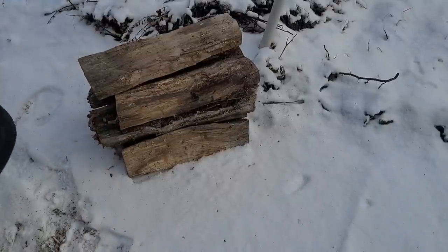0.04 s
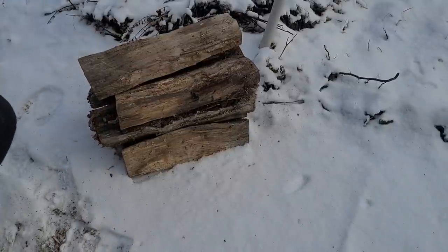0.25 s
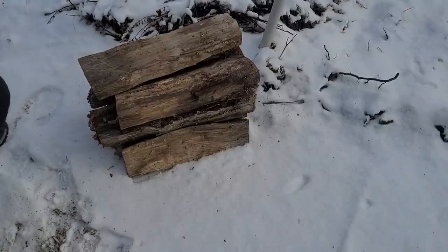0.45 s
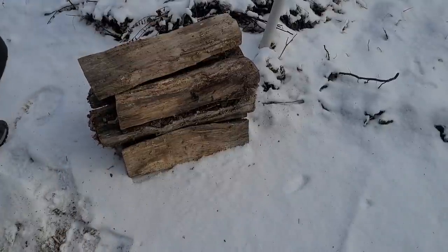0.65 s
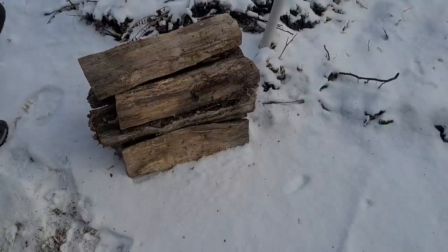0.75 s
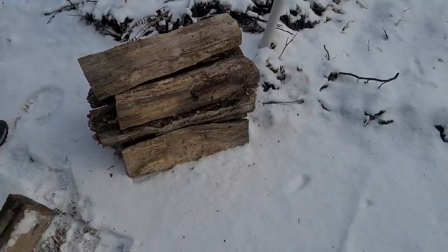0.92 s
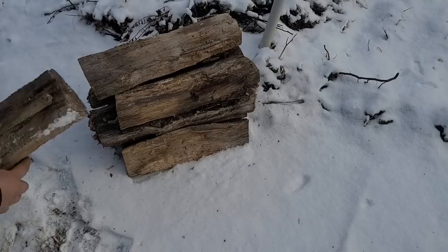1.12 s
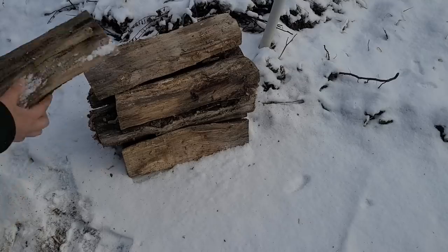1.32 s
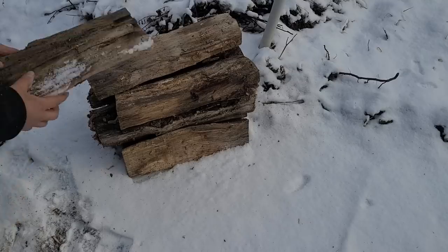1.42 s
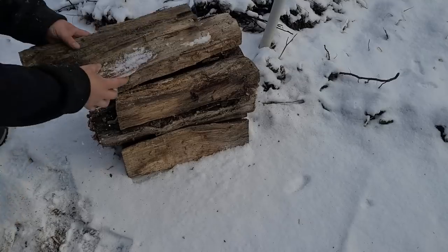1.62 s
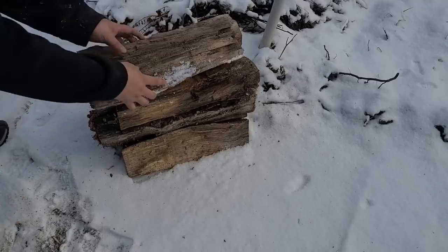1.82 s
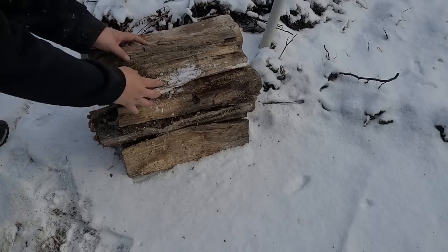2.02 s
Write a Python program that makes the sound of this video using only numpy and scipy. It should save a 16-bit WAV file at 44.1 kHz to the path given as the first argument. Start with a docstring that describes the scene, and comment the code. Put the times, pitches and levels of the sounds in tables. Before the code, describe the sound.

One sharp wooden clack as a log lands on a stack, over low wind rumble.

```python
"""A split log is laid on a small woodpile in the snow, near the microphone: two dull knocks, a sharp
clack as it drops home, then it rocks and settles. Each contact rings the wood and cracks the bark.
Before that come small ticks in the snow crust, then one soft low scuff, perhaps a sleeve. These near
sounds bounce once off the snow and scatter faintly round the yard. Puffs of wind buffet the microphone
over a steady far hush and a faint drone."""
import sys
import numpy as np
from scipy import signal
from scipy.fft import rfft, irfft, next_fast_len
from scipy.io import wavfile

SR = 44100
rng = np.random.default_rng(int(sys.argv[2]) if len(sys.argv) > 2 else 0)


def materialize(psi):
    """Save the field psi as 16-bit PCM at rate SR to the path in sys.argv[1].

    A 1-D psi becomes a single channel; in a 2-D psi each row is a channel.
    """
    bounded = np.clip(np.atleast_2d(psi).T, -1, 1)
    quanta = np.round(bounded * 32767).astype(np.int16)
    wavfile.write(sys.argv[1], SR, quanta)


N = 90757
T = np.arange(N) / SR


def log_on_stack():
    """Each contact pushes the wood's modes by where it lands and cracks the bark; the bark crumbles."""
    # log meets stack: start_s, push_db, hardness_hz, lowest_hz, place (0-1 along the log),
    # crack_db, crack_hz, crack_width_hz
    knocks = [(1.8436, -16.5, 1420, 453, .301, -24, 1930, 298),
              (1.8604, -10, 766, 60, 0.64, -34, 5100, 2490),
              (1.8622, -20.5, 1840, 100, .229, -33, 5700, 2520),
              (1.8715, -18, 1160, 710, 0.14, -39, 5300, 2200),
              (1.8734, -19.5, 6400, 262, 0.62, -26.5, 4070, 2480),
              (1.8779, -10, 9160, 670, .165, -27, 4900, 4400),
              (1.9182, -28, 2520, 840, 0.7, -50, 3720, 2500),
              (1.9510, -38.5, 3520, 1920, 0, -47, 4200, 2500),
              (2.0510, -40, 1530, 206, 0.17, -50, 3500, 2500)]
    # modes of the logs, by number of nodes along the wood: pitch_hz, level_db, t60_s
    modes = [(252, -8, 0.089), (396, -3, 0.07), (432, 8, 0.022), (442, 11, 0.013), (662, -11.5, 0.054),
             (745, -5, .07), (892, -4.5, 0.12), (1070, -7.5, 0.068), (1510, -2, 0.018), (1745, -3.5, 0.03),
             (2440, -11, .022), (2210, -7.5, 0.013), (2530, -8.5, 0.01), (3170, -1.5, 0.025)]
    # bark crumbling under the log: start_s, length_s, level_db
    scrapes = [(1.838, 0.058, -29.5), (1.885, 0.033, -38.5), (1.945, 0.018, -42)]
    # colour of the crumbling: frequency_hz, gain_db
    bark_colour = [(300, -7.5), (800, 2.5), (1800, -4), (3000, -8.5), (6000, -25), (9000, -35),
                   (16000, -35)]
    forces, places, bark = [], [], 0
    for start, push_db, hardness_hz, lowest_hz, place, crack_db, crack_hz, width_hz in knocks:
        offset = (T - start) * SR
        click = from_db(push_db) * np.sinc(offset) * (np.abs(offset) < 4)
        forces.append(cut(cut(click, hardness_hz, "low"), lowest_hz, "high", order=1))
        places.append(place)
        bark += snap(start, crack_db, crack_hz, width_hz, t60=.02, spray_db=-5.5,
                     top_hz=2.07 * hardness_hz)
    for start, length, db in scrapes:
        swell = np.sin(np.pi * np.clip((T - start) / length, 0, 1))
        bark += from_db(db) * swell * unit_rms(coloured(grit(), bark_colour))
    forces, places = np.array(forces), np.array(places)
    wood = from_db(-21) * ring(forces.sum(axis=0), hz=135, t60=.16)   # the whole stack gives: a thud
    for nodes, (hz, db, t60) in enumerate(modes, 1):
        spread_db = .6 * rng.standard_normal(len(places))
        share = np.cos(np.pi * nodes * places) * from_db(db + spread_db)
        wood += ring(share @ forces, hz, t60)
    wood_right = np.interp(T - .00008, T, wood)   # reaches the right side a little later
    return np.array([wood, wood_right]) + bark


def ticks_and_scuff():
    """Small ticks in the snow crust, then one soft low scuff, perhaps a sleeve: a high and a low band."""
    # four ticks, then the scuff: start_s, high_db, high_hz, high_width_hz, low_db, low_hz
    events = [(0.106, -54, 6000, 3000, -49.5, 1010), (0.3942, -41, 5080, 1250, -43.5, 1210),
              (0.469, -62, 4000, 2000, -49, 920), (0.7447, -37, 3120, 380, -38.5, 994),
              (1.707, -55, 6030, 3000, -34.5, 340)]
    bursts = np.zeros((2, N))
    for start, high_db, high_hz, width_hz, low_db, low_hz in events:
        bursts += snap(start, high_db, high_hz, width_hz, t60=.016, spray_db=-17, top_hz=9000)
        bursts += snap(start, low_db, low_hz, width_hz=213, t60=.045, spray_db=-17, top_hz=low_hz)
    return bursts


def snap(start, db, hz, width_hz, t60, spray_db, top_hz):
    """A brief burst of grains in one band, over a weaker broad spray."""
    grains, envelope = grit(), dying(start, t60)
    band = resonance(resonance(grains, hz, width_hz), hz, width_hz)
    burst = unit_rms(envelope * band) * np.sqrt(np.mean(envelope ** 2))
    spray = from_db(spray_db) * envelope * cut(grains, top_hz, "low")
    return from_db(db) * (burst + spray)


def grit():
    """Stereo noise in 16-sample grains of uneven strength."""
    noise = stereo_noise(side_db=-2)
    grain_db = 2.5 * np.repeat(rng.standard_normal(N // 16 + 1), 16)[:N]
    return unit_rms(noise * from_db(grain_db))


def snow_bounce(near):
    """One dull reflection off the packed snow, reaching each side of the microphone at its own time."""
    lags_s = (.00348, .00445)
    late = np.array([np.interp(T - lag, T, side) for lag, side in zip(lags_s, near)])
    return from_db(-15.5) * cut(late, 1520, "low")


def yard_scatter(near):
    """The surroundings scatter a weak, diffuse tail back to the microphone."""
    # colour of the scattered sound: frequency_hz, gain_db
    yard_colour = [(150, -10), (400, -11), (900, -3.5), (1800, 1), (4000, -3), (8000, 3), (16000, -2)]
    tail = coloured(stereo_noise(side_db=-2.5), yard_colour) * dying(start=.0056, t60=.26)
    tail /= np.sqrt(np.sum(tail ** 2) / 2)
    return from_db(-19) * signal.fftconvolve(near, tail, axes=1)[:, :N]


def wind_on_microphone():
    """Wind makes a lumpy rumble, separate at each microphone port, with short puffs that reach higher."""
    # colour of the rumble: frequency_hz, gain_db
    rumble_colour = [(20, -1), (40, -7), (68, 8.5), (100, -9), (160, -11), (300, -44), (700, -53)]
    # puffs on the microphone: centre_s, half_length_s, left_db, right_db, top_hz
    puffs = [(-0.02, 0.085, -30, -29, 240), (0.14, 0.035, -41.5, -40, 216), (0.274, 0.048, -33, -53, 104),
             (0.426, 0.017, -26.5, -36.5, 90.5), (0.543, 0.013, -23.5, -64, 141),
             (.57, 0.015, -26, -44, 370), (0.609, 0.019, -23.5, -27, 124), (0.639, 0.0084, -15, -47, 204),
             (0.666, 0.016, -20.5, -48, 204), (0.71, 0.032, -23.5, -22, 104),
             (0.814, 0.011, -24.5, -60, 204), (0.902, 0.0069, -25, -23.5, 105),
             (1.074, 0.033, -32, -22, 112), (1.198, 0.096, -32, -27, 110), (1.297, 0.023, -20, -35, 205),
             (1.352, 0.013, -17, -49, 213), (1.377, 0.047, -23, -53, 77), (1.503, 0.016, -54, -27.5, 83),
             (1.745, 0.016, -36, -32.5, 99), (1.861, 0.067, -25, -26.5, 83),
             (2.006, 0.014, -59, -27.5, 118)]
    evenness = .57   # 0 = random strength inside a puff, 1 = one smooth swell
    flutter = unit_rms(coloured(rng.standard_normal((2, N)), [(27, 0), (54, -20), (270, -90)]))
    rumble = unit_rms(coloured(rng.standard_normal((2, N)), rumble_colour))
    wind = from_db(-35 + 2 * flutter) * rumble
    air = cut(rng.standard_normal((2, N)), 41.2, "high")
    for centre, half_length, left_db, right_db, top_hz in puffs:
        eddies = cut(air, top_hz, "low", order=3)
        strength = np.abs(signal.hilbert(eddies, next_fast_len(N)))[:, :N] + 1e-9
        eddies = cut(eddies / strength ** evenness, 2 * top_hz, "low", order=3)
        soft_edge = from_db(-22) * unit_rms(cut(air, 2 * top_hz, "low"))
        eddies = unit_rms(eddies) + soft_edge
        swell = np.exp(-((T - centre) / half_length) ** 2)
        # unit rms under the swell, on each side
        eddies /= np.sqrt(np.sum((eddies * swell) ** 2, axis=1, keepdims=True) / np.sum(swell ** 2))
        wind += from_db([[left_db], [right_db]]) * swell * eddies
    return wind


def far_hush():
    """Open-air hush: the lows lean left, the treble leans right and drifts slowly in level."""
    # colour of the hush: frequency_hz, gain_db
    hush_colour = [(150, -11), (260, -6.5), (380, -5.5), (550, -9.5), (750, -11.5), (1000, -20),
                   (1450, -16), (2400, -25.5), (4000, -24.5), (6500, -27), (7700, -36.5), (12000, -32.5),
                   (15500, -36.5)]
    # likeness of left and right: frequency_hz, correlation
    likeness = [(100, 0.9), (400, 1), (1000, -0.11), (2500, 0.032), (5000, -0.15), (9000, 0.18),
                (15000, -0.051)]
    # drift of the treble, taken about its mean: time_s, level_db
    treble_drift = [(0, -52), (.1, -57.5), (.5, -55.5), (.8, -57.5), (1.1, -59.5), (1.55, -57),
                    (1.76, -54.5), (2.05, -55)]
    mid, side = rfft(rng.standard_normal((2, N)))
    alike = at_fft_bins(likeness)
    white = irfft(np.sqrt(1 + alike) * mid + np.sqrt(1 - alike) * side * [[1], [-1]], N)
    hush = from_db(-49.5) * unit_rms(cut(coloured(white, hush_colour), 171, "high"))
    lows = cut(hush, 730, "low", order=1)
    drift_db = np.interp(T, *np.transpose(treble_drift))
    lean_db = np.array([[-1.25], [1.25]])
    treble = (hush - lows) * from_db(.5 + drift_db - drift_db.mean() + lean_db)
    return lows * from_db(-lean_db) + treble


def far_drone():
    """A faint drone in the distance: one narrow band of noise."""
    return from_db(-52) * unit_rms(resonance(stereo_noise(side_db=-4.5), hz=368, width_hz=46))


def from_db(db):
    """Decibels to gain."""
    return 10 ** (np.asarray(db) / 20)


def unit_rms(x):
    """Scale to unit rms."""
    return x / np.sqrt(np.mean(x ** 2) + 1e-20)


def at_fft_bins(points):
    """Read (frequency_hz, value) points on a log-frequency axis at every FFT bin."""
    hz, value = np.transpose(points)
    return np.interp(np.log(np.arange(N // 2 + 1) * SR / N + 1), np.log(hz), value)


def coloured(x, colour):
    """Filter x by a curve of (frequency_hz, gain_db) points."""
    return irfft(rfft(x) * from_db(at_fft_bins(colour)), N)


def cut(x, hz, kind, order=2):
    """Butterworth low- or high-pass."""
    sections = signal.butter(order, np.clip(hz, 10, .45 * SR), kind, fs=SR, output="sos")
    return signal.sosfilt(sections, x + 1e-18)


def resonance(x, hz, width_hz):
    """One resonant band with unit gain at its peak."""
    radius, angle = np.exp(-np.pi * width_hz / SR), 2 * np.pi * hz / SR
    gain = (1 - radius ** 2) / 2
    return signal.lfilter([gain, 0, -gain], [1, -2 * radius * np.cos(angle), radius ** 2], x)


def ring(force, hz, t60):
    """One mode: a unit click starts a dying sine of height 1."""
    radius, angle = np.exp(-np.log(1000) / (t60 * SR)), 2 * np.pi * hz / SR
    feedback = [1, -2 * radius * np.cos(angle), radius ** 2]
    return signal.lfilter([0, np.sin(angle)], feedback, force + 1e-18)


def dying(start, t60):
    """Envelope that jumps up at start and falls 60 dB in t60 seconds."""
    return (T >= start) * np.exp(-np.log(1000) * np.maximum(T - start, 0) / t60)


def stereo_noise(side_db):
    """White noise, partly shared by both sides."""
    mid, side = rng.standard_normal((2, N))
    return unit_rms(mid + from_db(side_db) * side * [[1], [-1]])


def scene():
    """Log, ticks and scuff close by in the yard, wind on the microphone, hush and drone far off."""
    near = log_on_stack() + ticks_and_scuff()
    return near + snow_bounce(near) + yard_scatter(near) + wind_on_microphone() + far_hush() + far_drone()


def record(dry):
    """The recorder cuts the top steeply above 15.8 kHz."""
    return signal.sosfilt(signal.ellip(10, .1, 80, 15800, fs=SR, output="sos"), dry)


dry = scene()
out = record(dry)
materialize(out)
```